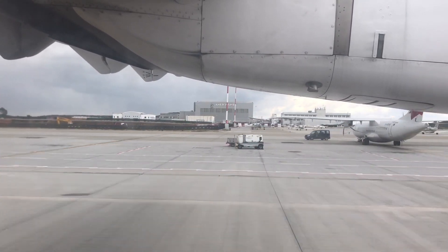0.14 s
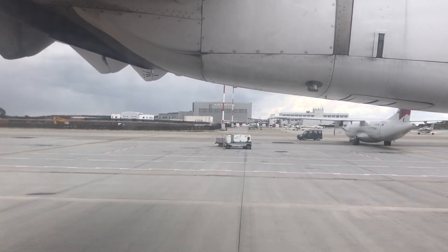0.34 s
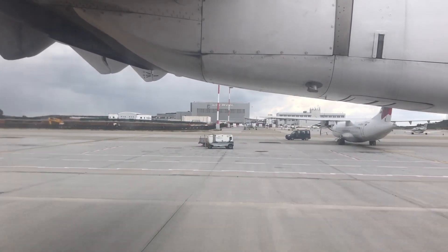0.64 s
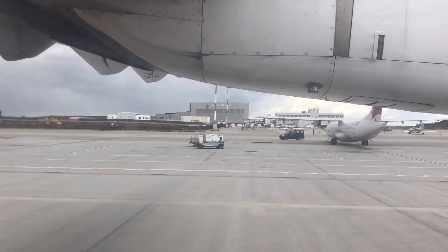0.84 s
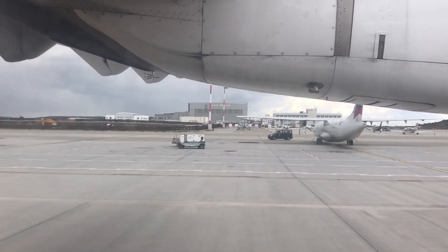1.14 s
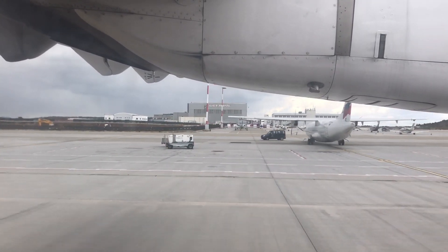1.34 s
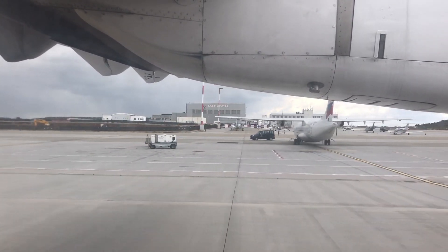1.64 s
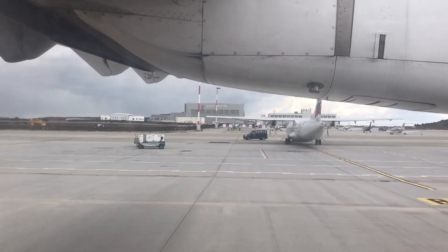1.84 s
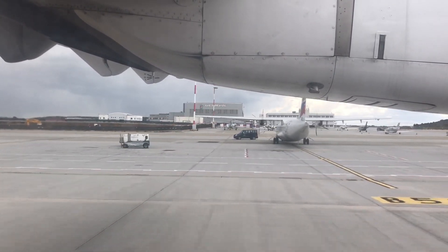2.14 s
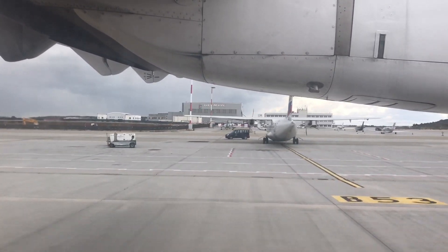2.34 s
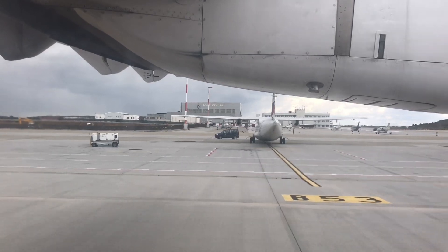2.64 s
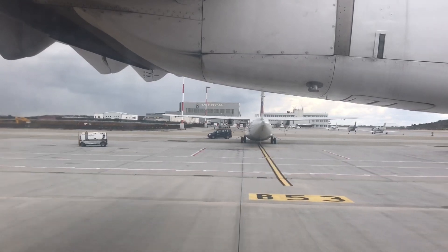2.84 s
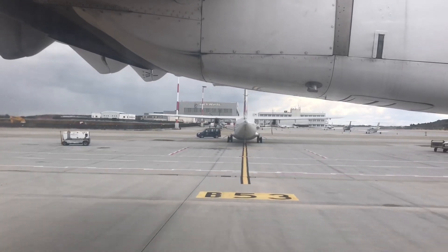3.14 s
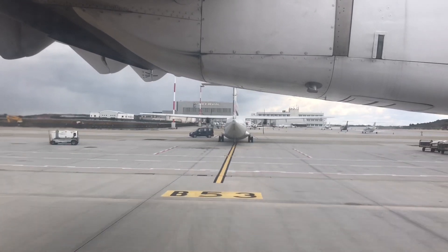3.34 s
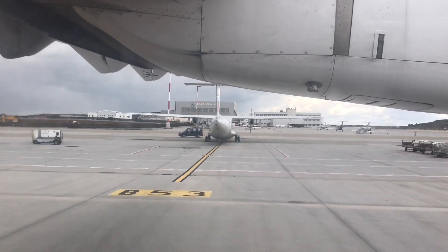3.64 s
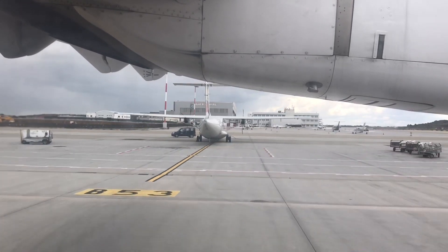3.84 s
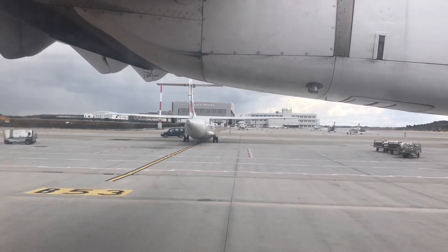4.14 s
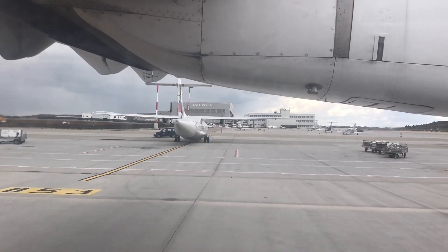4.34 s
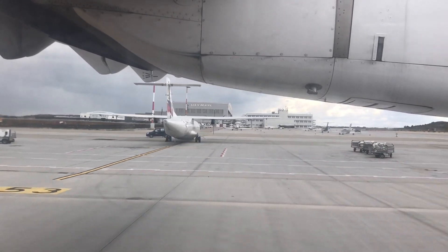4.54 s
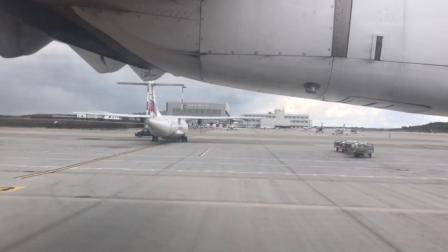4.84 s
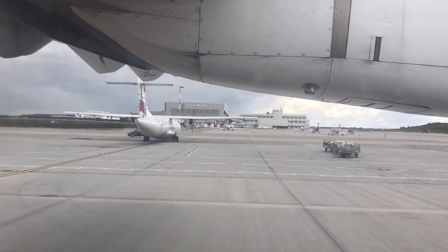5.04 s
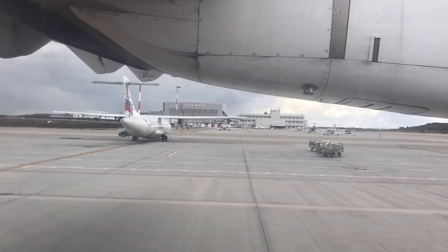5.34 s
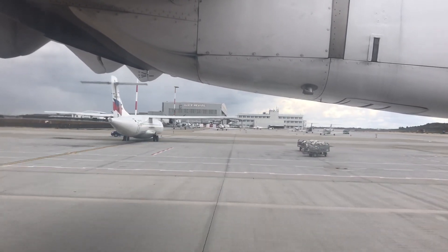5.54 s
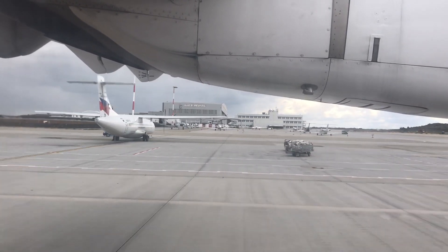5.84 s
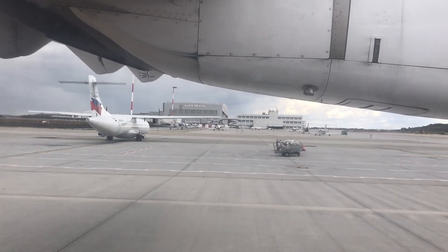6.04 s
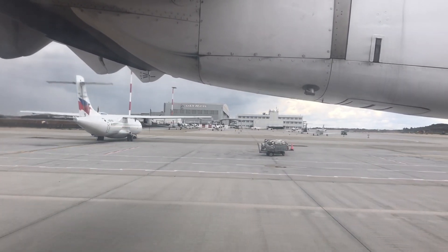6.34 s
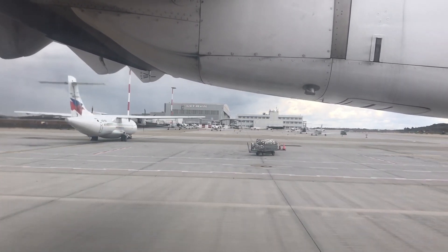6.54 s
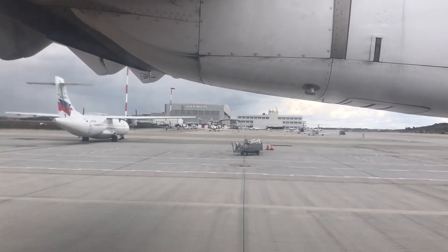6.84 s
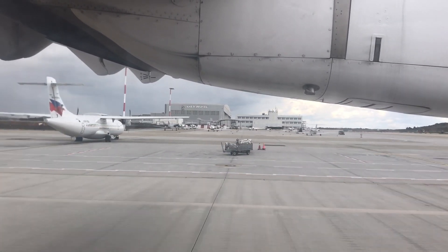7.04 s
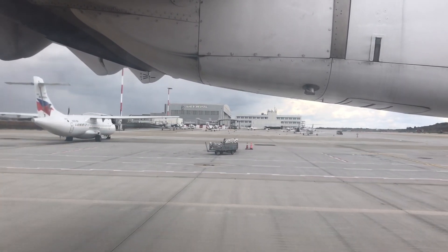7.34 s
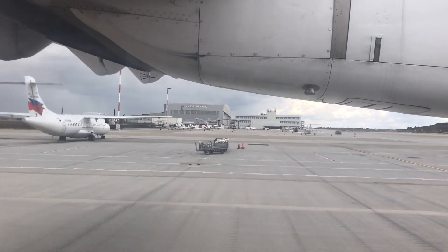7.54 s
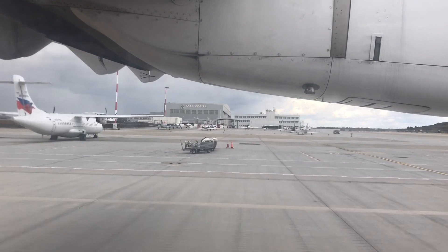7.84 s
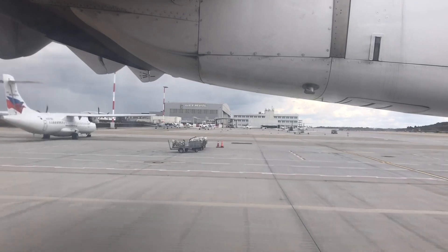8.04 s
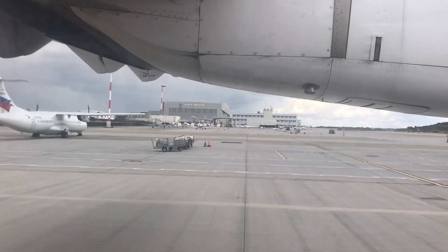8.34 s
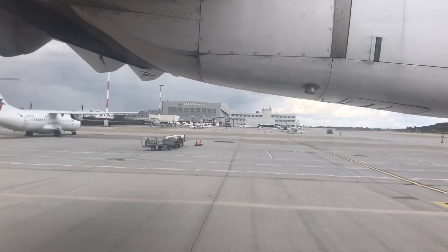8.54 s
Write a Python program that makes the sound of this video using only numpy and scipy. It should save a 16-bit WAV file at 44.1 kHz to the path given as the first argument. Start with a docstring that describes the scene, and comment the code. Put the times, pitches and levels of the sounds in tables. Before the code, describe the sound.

From the first moment to the end at about 8.7 seconds, a twin turboprop aircraft taxis at steady power, heard from a cabin seat under the wing. A loud, low propeller drone dominates, throbbing irregularly over a steady engine hum. The propeller wash rumbles and roars against the fuselage, and the rolling wheels add a deep, even rumble. The roar swells slightly around 2.5 to 3.3 seconds and near 5 seconds, dips briefly at 5.5, then recovers. Much quieter, a thin high tone holds one pitch throughout, growing a little stronger around 6.5 seconds. Breathy, slightly warbling turbine whistles and a soft hiss of air sit above it. The engine speed never changes, and the overall loudness stays nearly constant.

```python
"""Cabin seat under the wing of a twin turboprop taxiing at steady power.
Propeller blades chop gusty air into a throbbing drone; their wash rumbles and roars on the fuselage.
Shafts hum, turbine stages whistle through the wall, an accessory drive holds one thin tone.
Air hisses and the wheels rumble underneath."""
import sys
import numpy as np
from scipy import signal
from scipy.fft import rfft, irfft, next_fast_len
from scipy.io import wavfile
from scipy.ndimage import uniform_filter1d, minimum_filter1d

SR = 44100
rng = np.random.default_rng(int(sys.argv[2]) if len(sys.argv) > 2 else 0)


def waveform_to_disk(signal):
    """Save audio, clipped to [-1, 1], as 16-bit WAV at the path in sys.argv[1]."""
    frames = np.transpose(np.atleast_2d(signal))
    scaled = np.clip(frames, -1, 1) * 32767
    samples = np.round(scaled).astype(np.int16)
    wavfile.write(sys.argv[1], SR, samples)


N = 382788

# Swell of the propeller wash. Each row: time in seconds, level offset in dB.
WASH_SWELL = [(0, 0), (1.3, -1.3), (2.4, 1.0), (3.3, 1.2), (4.05, -0.6), (4.95, 1.7), (5.5, -3), (6.1, 0),
              (7.3, -1), (8.15, 0.7), (8.68, -0.5)]
# Swell of the blade-rate tone. Each row: time in seconds, level offset in dB.
BLADE_SWELL = [(0.0, 1), (0.3, -11), (0.6, 7.5), (0.9, -10), (1.2, 1.7), (2.24, 4), (2.39, 0.5), (3.74, 4),
               (3.89, -13), (4.49, 9), (4.64, -0.3), (6.14, -5), (6.29, 4.5), (6.58, -5.5), (7.33, 2),
               (8.68, 1.5)]
WASH_SHARE = 0.98   # part of the wash swell in the roar and the upper blade harmonics


def propellers(blade_hz=84.3, sway_hz=1.49, base_db=-22):
    """Blade-rate harmonics: the low three sway and throb in gusts, eddies smear the rest."""
    # Swell of harmonic 3. Each row: time in seconds, level offset in dB.
    third_swell = [(0.0, -6.5), (0.3, 4.5), (1.05, -4), (2.39, 5), (2.69, -1.7), (3.29, -1), (3.44, 4),
                   (4.19, -2.5), (4.94, 2), (5.24, -6), (5.69, 2), (5.99, -6.5), (6.44, 3.5), (7.33, -2.6),
                   (7.63, 0.7), (8.68, 1)]
    # Each row: harmonic number, width in Hz, base level in dB.
    overtones = [(2, 19, -26.5), (3, 24, -28), (4, 25, -29.5), (5, 26.5, -30.5), (6, 15, -41.5),
                 (7, 9.4, -47), (8, 16, -49)]
    hz = blade_hz + sway_hz * drift(width_hz=7.1)
    throb = from_db(1.14 * drift(width_hz=14))
    first_gain = from_db(base_db + curves(BLADE_SWELL)[0])
    third_gain = from_db(base_db + curves(third_swell)[0])
    drone = first_gain * tone(hz, unsteady(share=0.34, width_hz=11.8))
    drone += gust_surges() * throb * tone(2 * hz, unsteady(share=0.25, width_hz=20.6))
    drone += third_gain * tone(3 * hz, unsteady(share=0.5, width_hz=19.7))
    swell_db = WASH_SHARE * curves(WASH_SWELL)[0]
    for harmonic, width_hz, level_db in overtones:
        drone += from_db(level_db + swell_db) * tone(round(harmonic) * blade_hz, flutter(width_hz))
    return drone


def gust_surges(rest_db=-21.5):
    """Gain of the second, loudest blade harmonic: each gust lifts it in a smooth hump."""
    # Each row: centre in seconds, length in seconds, peak level in dB.
    gusts = [(0.33, 0.33, -13), (0.84, 0.22, -16.5), (1.03, 0.17, -13), (1.99, 0.45, -11.5),
             (2.216, 0.11, -11.5), (2.448, 0.22, -12.3), (3.222, 0.25, -13), (3.83, 0.47, -14.5),
             (4.467, 0.3, -11), (4.714, 0.21, -12.5), (4.97, 0.22, -11), (5.183, 0.28, -10.5),
             (5.66, 0.17, -14.5), (6.986, 0.25, -15), (7.444, 0.24, -15.5), (8.149, 0.15, -11.5)]
    t = np.arange(N) / SR
    rest = from_db(rest_db)
    gain = np.full(N, rest)
    for centre_s, length_s, peak_db in gusts:
        inside = np.abs(t - centre_s) < length_s / 2
        hump = np.cos(np.pi * (t[inside] - centre_s) / length_s)
        gain[inside] += (from_db(peak_db) - rest) * hump
    return gain


def propeller_wash(rumble_gust_db=1.2, roar_gust_db=0.6, gust_width_hz=18):
    """The slipstream beats on the cabin skin: rumble and roar, with slow swells and quick gusts."""
    # Two noise spectra. Each row: frequency in Hz, density in dB per Hz.
    rumble_spectrum = [(30, -95), (70, -52), (95, -41), (119, -35.5), (142, -37.5), (170, -42),
                       (200, -44.5), (235, -45), (330, -72), (600, -100)]
    roar_spectrum = [(120, -71), (220, -64), (270, -48.5), (310, -47.5), (400, -48), (448, -46),
                     (485, -54.5), (570, -57), (820, -58.5), (1000, -66.5), (1500, -76.5), (4000, -110)]
    rumble = shaped_noise(rumble_spectrum)
    rumble *= from_db(0.2 * curves(BLADE_SWELL)[0] + rumble_gust_db * drift(gust_width_hz))
    roar = shaped_noise(roar_spectrum)
    roar *= from_db(WASH_SHARE * curves(WASH_SWELL)[0] + roar_gust_db * drift(gust_width_hz))
    return rumble + roar


def shafts():
    """Governed shafts and gears hold their tones within a fraction of a percent."""
    # Each row: frequency in Hz, level in dB, fluttering share of the power.
    shaft_tones = [(61.8, -41, 0.55), (128.8, -25, 0.13), (214.9, -32.5, 0.2), (1031, -51.5, 0.1)]
    speed = 1 + 0.0012 * drift(width_hz=2.25)
    return sum(from_db(level_db) * tone(hz * speed, unsteady(share, width_hz=11))
               for hz, level_db, share in shaft_tones)


def wheels():
    """Rolling wheels send an even, deep rumble through the airframe."""
    # Each row: frequency in Hz, density in dB per Hz.
    rolling_spectrum = [(15, -82), (28, -72), (41, -55.5), (52, -49), (63, -43.5), (78, -39.5), (100, -53),
                        (200, -64), (500, -120)]
    return shaped_noise(rolling_spectrum)


def rushing_air(flicker_db=0.45):
    """Airflow hisses, rings panels and ducts, and flickers a little."""
    # Each row: frequency in Hz, density in dB per Hz.
    hiss_spectrum = [(400, -96), (1000, -66), (1300, -69), (2000, -72), (2800, -75.5), (3400, -79.5),
                     (3850, -79.5), (4550, -77), (6100, -80.5), (7150, -77.5), (7750, -83.5), (9600, -84.5),
                     (12000, -90.5), (15600, -97)]
    # Each row: resonance in Hz, width in Hz, level in dB.
    resonances = [(1114, 91, -42.5), (1532, 117, -46), (1724, 30, -54), (2116, 36, -53.5),
                  (2430, 57, -56.5), (3284, 61, -60.5), (3556, 92, -61.5), (4200, 290, -50),
                  (5485, 340, -51), (6390, 130, -54.5), (8410, 420, -52), (10030, 90, -73),
                  (10530, 270, -59), (13520, 160, -70), (15520, 240, -71)]
    ringing = sum(from_db(level_db) * tone(hz, flutter(width_hz))
                  for hz, width_hz, level_db in resonances)
    return (shaped_noise(hiss_spectrum) + ringing) * from_db(flicker_db * drift(width_hz=25))


def turbines():
    """Each turbine or compressor blade row gives a breathy, unevenly warbling whistle."""
    # Each row: pitch in Hz, width in Hz, level in dB, warble depth in Hz, warbles per second.
    whistles = [(1786, 30, -51.5, 3.9, 3), (3134, 54, -52, 14.7, 2.85), (4105, 40, -48, 8.9, 2.7),
                (4354, 60, -46, 12.7, 5.1), (8560, 100, -52.5, 26.4, 9.5), (9020, 130, -56, 26, 5),
                (12320, 90, -66, 25, 5)]
    out = np.zeros(N)
    for hz, width_hz, level_db, depth_hz, warbles_per_s in whistles:
        rate_hz = warbles_per_s * (1 + 0.25 * drift(width_hz=3.02))
        warble = np.sin(2 * np.pi * np.cumsum(rate_hz) / SR)
        out += from_db(level_db) * tone(hz + depth_hz * warble, flutter(width_hz))
    return out


def accessory_drive(mesh_hz=1880, wander_hz=1.31, third_offset_db=-10):
    """A gear mesh sings one clean tone with a weak, less steady third harmonic."""
    # Each row: time in seconds, level in dB.
    mesh_levels = [(0, -47.5), (2.5, -47.5), (6.5, -45), (8.68, -48.5)]
    hz = mesh_hz + wander_hz * drift(width_hz=1.8)
    level_db = curves(mesh_levels)[0]
    mesh = from_db(level_db) * tone(hz, unsteady(share=0.08, width_hz=18))
    third = from_db(level_db + third_offset_db) * tone(3 * hz, unsteady(share=0.4, width_hz=14))
    return mesh + third


def window_recess(x):
    """Short reflections off near surfaces ripple the spectrum."""
    # Each row: delay in seconds, signed gain.
    reflections = [(.001828, -.09), (.002208, .07), (.002628, -.06), (.001492, -.05), (.003248, .045)]
    return x + sum(gain * np.roll(x, round(delay_s * SR)) for delay_s, gain in reflections)


def from_db(db):
    """Decibels to gain."""
    return 10 ** (np.asarray(db) / 20)


def unit_rms(x):
    """Scale to unit power."""
    return x / np.sqrt(np.mean(np.abs(x) ** 2) + 1e-20)


def curves(rows):
    """One per-sample curve for each column after the time."""
    times_s, *columns = np.transpose(rows)
    return [np.interp(np.arange(N) / SR, times_s, column) for column in columns]


def flutter(width_hz, hop=16):
    """Random complex gain with a bell-shaped spectrum; power 1."""
    count = next_fast_len(N // hop + 2)
    hz = np.fft.fftfreq(count, hop / SR)
    real, imaginary = rng.standard_normal((2, count))
    bell = 2 ** (-2 * (hz / width_hz) ** 2)
    slow = np.fft.ifft((real + 1j * imaginary) * bell)
    return np.interp(np.arange(N) / hop, np.arange(count), unit_rms(slow))


def drift(width_hz):
    """Slow random wander; RMS 1."""
    return unit_rms(flutter(width_hz).real)


def unsteady(share, width_hz):
    """Steady gain with a share of its power fluttering."""
    return np.sqrt(1 - share) + np.sqrt(share) * flutter(width_hz)


def tone(hz, gain):
    """Sine on a pitch curve; a complex gain also shifts its phase."""
    phase = 2 * np.pi * np.cumsum(hz * np.ones(N)) / SR + rng.uniform(0, 2 * np.pi)
    return np.sqrt(2) * (gain.real * np.cos(phase) - gain.imag * np.sin(phase))


def shaped_noise(spectrum):
    """Noise with the given density, interpolated over log frequency."""
    size = next_fast_len(N)
    hz, density_db = np.transpose(spectrum)
    bins_hz = np.fft.rfftfreq(size, 1 / SR)
    colour = from_db(np.interp(np.log(bins_hz + 1), np.log(hz), density_db))
    white = rfft(rng.standard_normal(size))
    return irfft(white * colour, size)[:N] * np.sqrt(SR / 2)


def scene():
    """All sources add at the seat, in mono."""
    engines = propellers() + shafts() + accessory_drive() + turbines()
    return (engines + propeller_wash() + wheels() + window_recess(rushing_air()))[None]


def record(dry):
    """Fast peak limiter, then a steep low-pass."""
    ceiling, limiter_s, cutoff_hz = 0.9, 0.006, 15750
    size = round(limiter_s * SR)
    needed_gain = ceiling / np.maximum(np.abs(dry), ceiling)
    limited = dry * uniform_filter1d(minimum_filter1d(needed_gain, size), size)
    lowpass = signal.ellip(12, 0.1, 80, cutoff_hz, fs=SR, output="sos")
    return signal.sosfilt(lowpass, limited)


dry = scene()
out = record(dry)
waveform_to_disk(out)
```